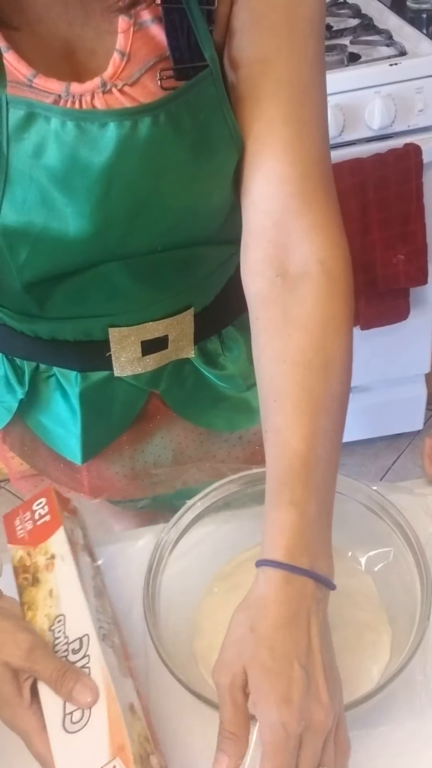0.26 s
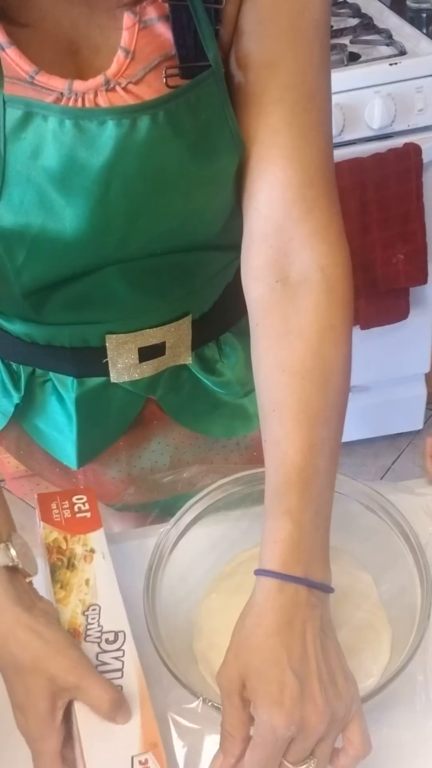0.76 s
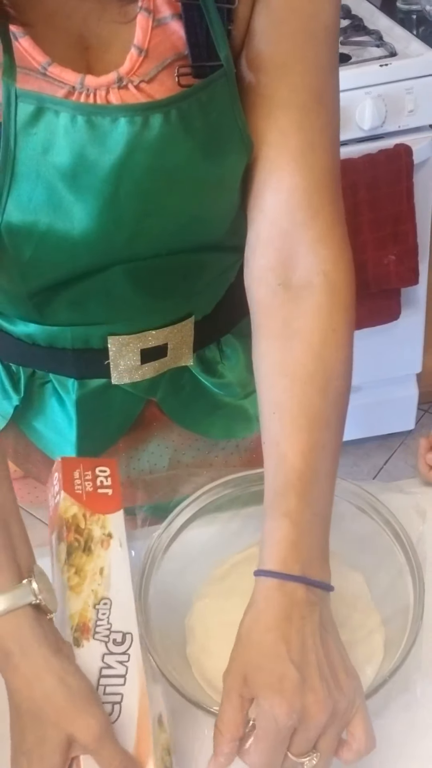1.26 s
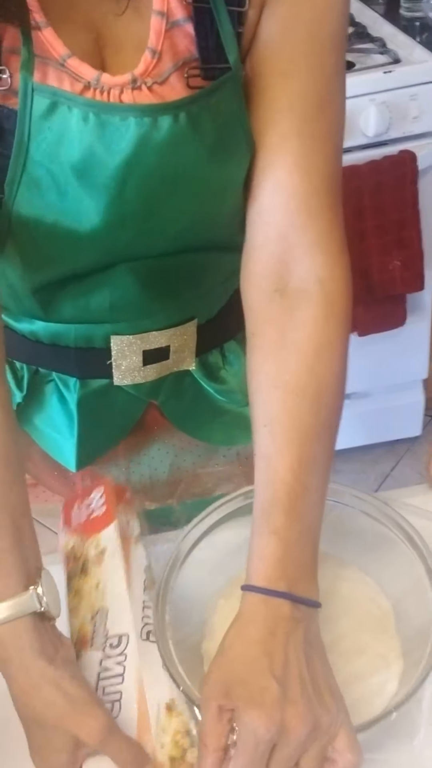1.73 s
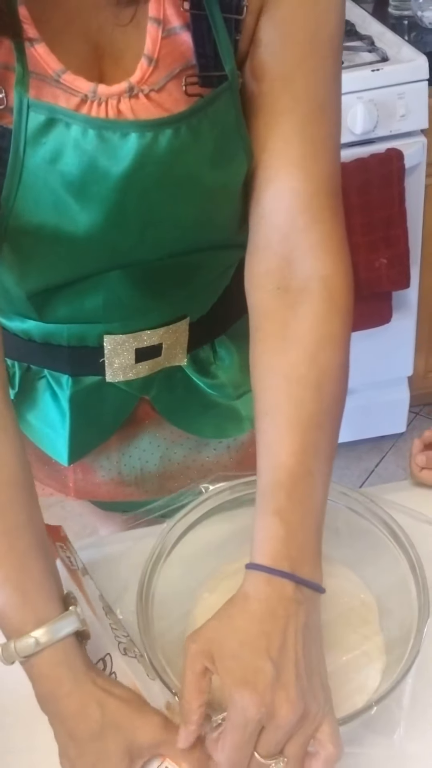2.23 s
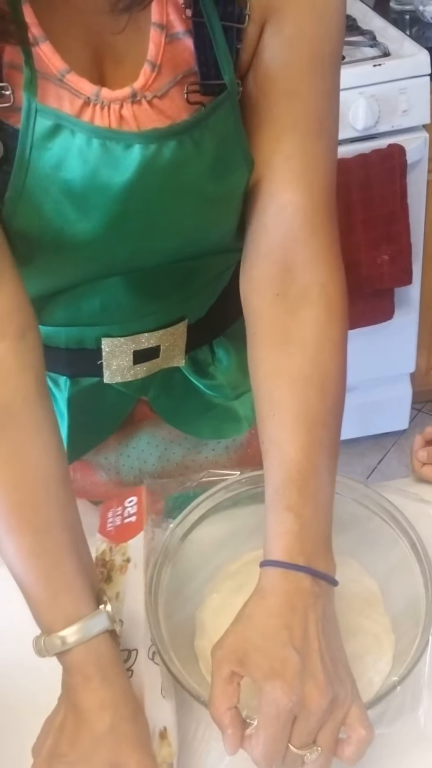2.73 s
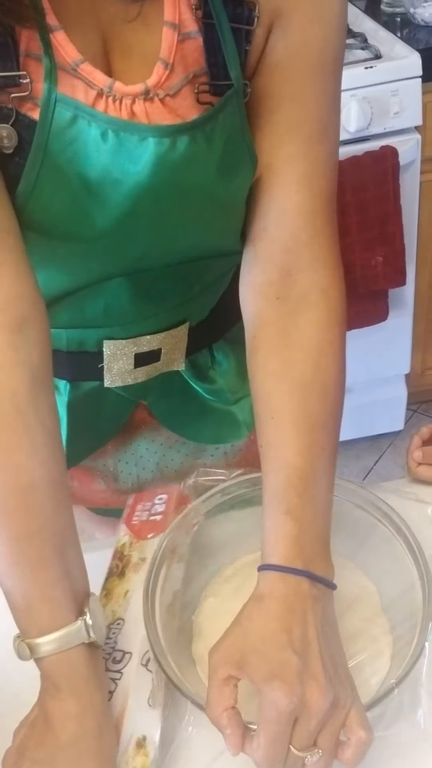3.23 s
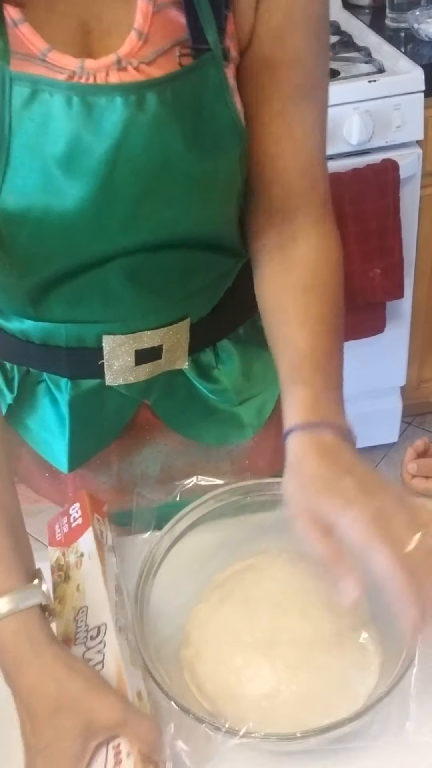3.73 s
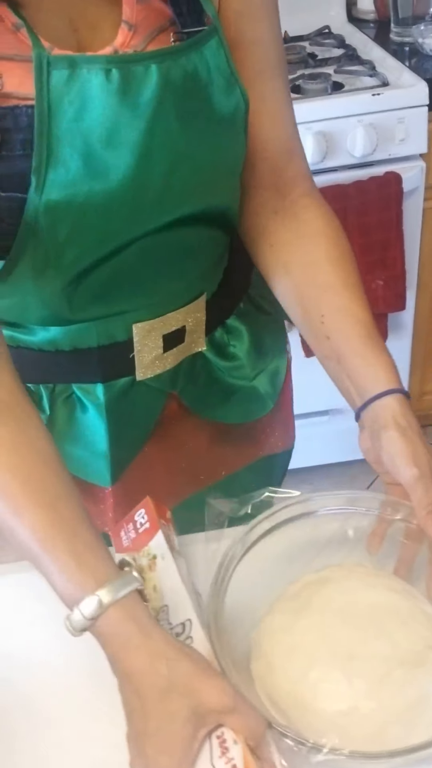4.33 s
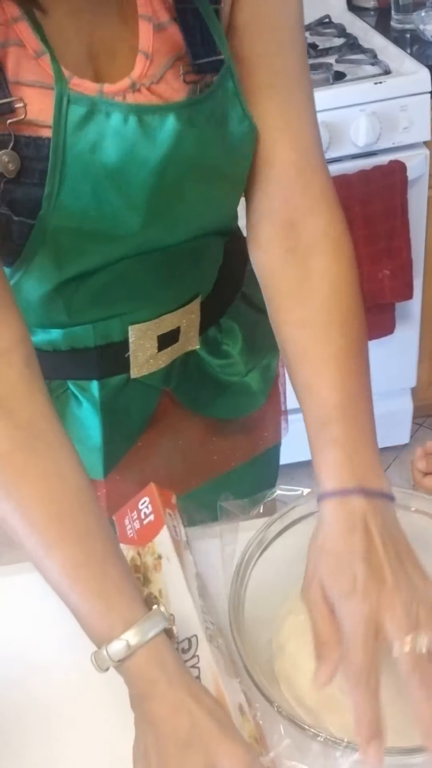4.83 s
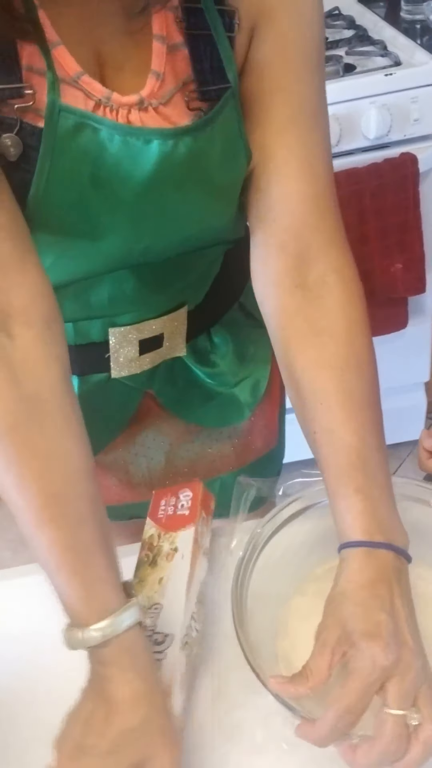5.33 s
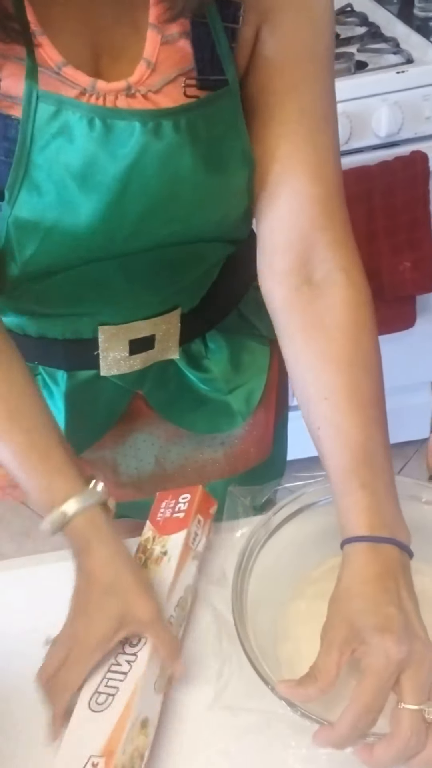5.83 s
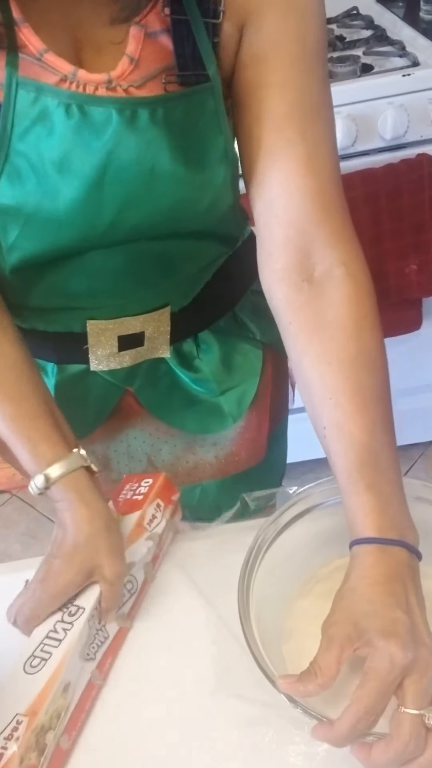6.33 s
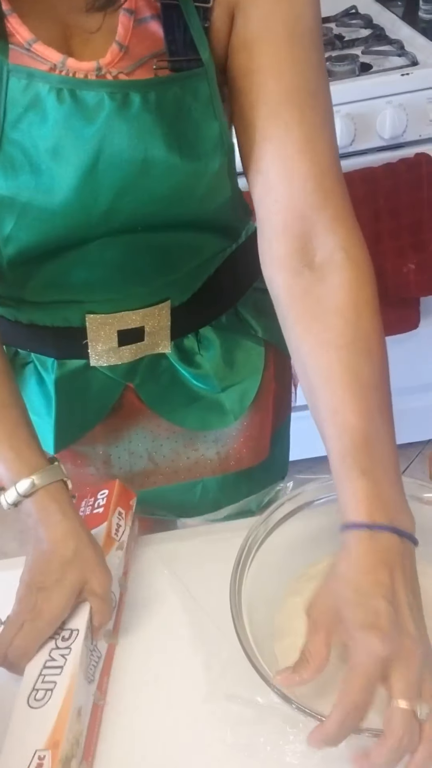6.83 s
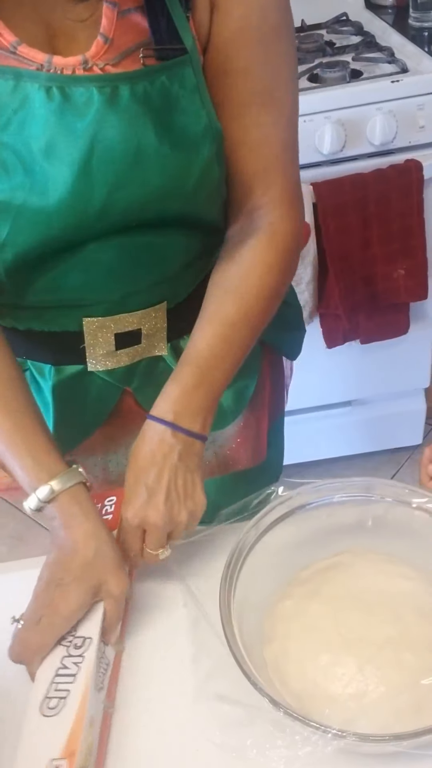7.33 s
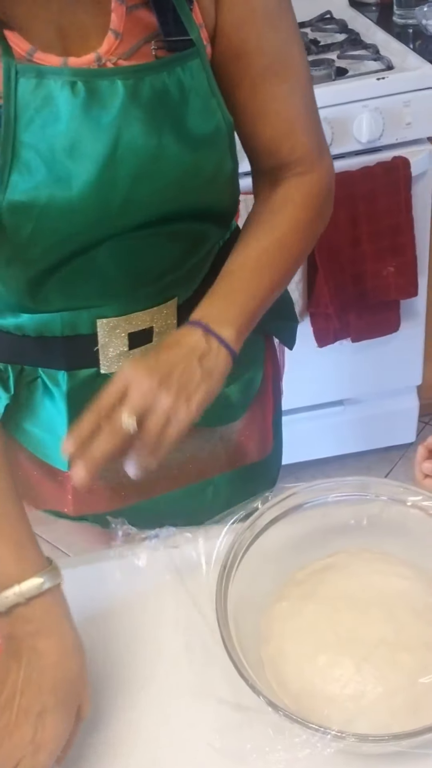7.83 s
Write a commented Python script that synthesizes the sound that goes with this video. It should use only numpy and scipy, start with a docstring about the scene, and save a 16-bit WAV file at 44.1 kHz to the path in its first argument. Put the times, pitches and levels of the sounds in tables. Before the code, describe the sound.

Close up in a small hard kitchen, plastic film rustles softly, then crackles and snaps harder as it is pulled from a cardboard carton. A dull knock lands, the carton scrapes, a glass bowl clinks sharply past the middle, and the film rips briefly. A strong counter thump follows, then quieter rubbing and a few light knocks. A phone hears it in stereo with short room echo.

```python
"""A kitchen counter in a small, hard room: cling film is drawn from its carton, stretched over a glass bowl
and torn off. Film crackles and snaps arise from random slips and filtered noise bursts; knocks of carton,
roll and settling bowl, counter booms and one clink of the bowl are sums of decaying modes, some with noise.
Scraping and sliding are filtered friction noise. A phone with two ports hears it close by, with the room's
echo and a faint steady noise."""
import sys
import numpy as np
from scipy import signal
from scipy.fft import rfft, irfft
from scipy.io import wavfile

SR = 44100
rng = np.random.default_rng(int(sys.argv[2]) if len(sys.argv) > 2 else 0)


def pcm_store(signal):
    """Save signal as 16-bit PCM."""
    levels = np.round(np.clip(np.atleast_2d(signal), -1, 1) * 32767)
    wavfile.write(sys.argv[1], SR, levels.astype(np.int16).T)


N = 355446
TIME = np.arange(N) / SR  # s

# pulls that draw and wrinkle the film: start_s, length_s, relative_level_db
FILM_PULLS = [(0.03, 0.13, -56.5), (0.34, 0.35, -58), (0.66, 0.26, -54.5), (0.88, 0.34, -54),
              (1.15, 0.15, -46.5), (1.43, 0.13, -43), (1.69, 0.28, -47.5), (2.09, 0.27, -54),
              (2.29, 0.2, -48.5), (2.43, 0.1, -44.5), (2.7, 0.084, -52.5), (2.91, 0.11, -48),
              (3.2, 0.3, -50), (3.41, 0.14, -48.5), (3.72, 0.38, -54.5), (4.5, 0.51, -54),
              (5.05, 0.15, -47), (5.45, 0.22, -51.5), (6.07, 0.12, -59), (6.41, 0.26, -65),
              (6.87, 0.035, -62), (7.14, 0.078, -60), (7.39, 0.14, -59), (7.55, 0.09, -53),
              (7.8, 0.12, -57.5)]
# single creases that snap through, loud and small: start_s, relative_peak_db, papery_body_re_snap_db
CREASE_SNAPS = [(0.7051, -28.5, -6.5), (0.7309, -28, -13), (1.1192, -36.5, -9), (1.2292, -29.5, -8),
                (1.2864, -26.5, -10), (1.4327, -21, -9.5), (1.456, -12.5, -12), (1.485, -18, -7),
                (1.5654, -22.5, -12.5), (1.8535, -28, 12), (1.866, -16.5, -13), (2.0201, -28.5, -12),
                (2.1243, -31, 0), (2.3161, -26.5, -7), (2.3802, -27, -7.5), (2.4766, -17, -33),
                (2.52, -28, -15), (2.539, -18, -15.5), (2.576, -31, -4), (2.7318, -32.5, -8.5),
                (2.7645, -26.5, -20), (2.8034, -27, -19), (2.8504, -32.5, -25), (2.9292, -18, -28),
                (2.951, -23.5, -14.5), (2.997, -21.5, -14), (3.148, -28.5, -27), (3.169, -29.5, -10),
                (3.7358, -24.5, -30), (3.7427, -25.5, -11), (4.9122, -31.5, -30), (5.1178, -29.5, -10),
                (5.294, -22.5, -16.5), (5.3006, -21, -8.5), (5.3464, -19.5, -12.5), (5.366, -8, -11),
                (5.3951, -8.5, -6.5), (5.4675, -26, 2.5), (5.517, -32, -2), (5.7426, -40, 13.5),
                (5.7573, -29.5, 14), (6.119, -30.5, 2.5), (6.4205, -32, -9.5), (6.558, -31.5, -11),
                (6.661, -21.5, -12), (6.6709, -28.5, -4.5), (6.7346, -33, -8), (7.5499, -21, -1)]
# knocks of the carton and its roll, and one dull blow as the bowl settles:
# start_s, relative_peak_db, hardness_tilt_db_per_octave
KNOCK_EVENTS = [(0.172, -31.5, 3), (0.343, -31, -2.5), (0.385, -33, 6), (0.551, -30.5, -15.5),
                (1.044, -31, -7), (1.3, -30.5, -4), (1.727, -27, -4), (1.827, -20.5, 25),
                (1.852, -8.5, -8.5), (2.126, -25, -12), (2.317, -30, -4), (2.475, -29, 1), (3.7359, -23, 1),
                (3.9, -22.5, 3.5), (3.921, -26, 7), (4.44, -21, -5), (4.66, -26.5, -9.5),
                (4.912, -31.5, -8), (5.396, -12, 7), (5.4675, -19, -4.5), (5.757, -27, -2),
                (5.81, -26.5, 2), (6.19, -19.5, -7), (7.553, -21.5, -5), (7.857, -27, -36),
                (7.956, -21.5, -30.5)]
# blows that reach the counter top: start_s, dry_peak_db, contact_time_ms
COUNTER_BLOWS = [(0.173, -39.5, 0.75), (0.347, -34.5, 1.3), (0.422, -35, 1.3), (0.555, -34, 1.2),
                 (1.853, -18, 0.57), (1.872, -12.5, 0.4), (2.081, -23, 0.66), (3.001, -19, 4.9),
                 (3.31, -31.5, 1.7), (4.39, -21, 3), (4.66, -29, 0.74), (5.393, -18.5, 0.65),
                 (5.468, -14.5, 2.7), (5.758, 0, 1.8), (6.241, -15.5, 6), (7.153, -36, 4.7),
                 (7.411, -25.5, 4.9), (7.548, -24.5, 4.2), (7.955, -13.5, 1.8)]
# strikes on the glass bowl: start_s, dry_peak_db
BOWL_STRIKES = [(4.3858, -4.5)]
# shoves of carton and bowl: start_s, length_s, relative_rub_level_db, relative_rumble_level_db
COUNTER_SHOVES = [(0, 0.11, -52.5, -53), (0.343, 0.11, -55, -74), (0.53, 0.32, -58.5, -63),
                  (1.015, 0.2, -54.5, -60.5), (1.18, 0.54, -48.5, -52.5), (1.53, 0.48, -47, -41.5),
                  (2.008, 0.26, -57, -42), (2.24, 0.33, -53.5, -52), (2.704, 0.087, -58.5, -50),
                  (2.917, 0.28, -56.5, -48.5), (3.307, 0.19, -47.5, -45), (3.733, 0.095, -52, -46.5),
                  (3.893, 0.083, -48.5, -36.5), (4.092, 0.3, -49, -34.5), (4.623, 0.14, -56, -49),
                  (4.88, 0.4, -51, -50), (5.42, 0.48, -50, -37), (5.986, 0.24, -48, -34),
                  (6.36, 0.37, -74, -48.5), (6.874, 0.026, -61.5, -51), (7.136, 0.43, -60.5, -47.5),
                  (7.368, 0.24, -55.5, -43.5), (7.517, 0.36, -51, -43.5), (7.73, 0.24, -52, -44)]
# smooth slides of bowl, carton and hand: start_s, length_s, hiss_centre_hz, relative_level_db
SMOOTH_SLIDES = [(4.01, 0.48, 2730, -48.5), (4.868, 0.18, 1070, -52), (5.026, 0.26, 770, -48),
                 (5.953, 0.42, 2650, -55), (6.867, 0.13, 2970, -62.5), (7.699, 0.088, 3820, -47)]

# modes of the counter top: nominal_frequency_hz, relative_level_db, t60_s
COUNTER_MODES = [(54.7,-20,0.46), (89.5,-24.5,0.17), (114.3,-16,0.5), (144,0,0.17), (194.8,0.5,0.076),
                 (236,-2.5,0.049), (289,-10,0.26), (327.6,-18,0.15), (420,-4,0.081)]
# modes of the hollow carton: nominal_frequency_hz, relative_level_db, t60_s
CARTON_MODES = [(335.3, -7, 0.11), (650, -21.5, 0.12), (778, 7, 0.03), (800, -7, 0.06), (1010, -42, 0.0203),
                (1170, 1, 0.04), (1395, -4.5, 0.021), (1610, -4, 0.015), (1950, -25.5, .03),
                (2550, 3.5, 0.0099), (3080, -31.5, 0.0097)]
# modes of the glass bowl: frequency_hz, relative_level_db, t60_s
BOWL_MODES = [(581,-2,.21), (775,-20,.2), (947,-15,.12), (1287,-21,.2), (1660,0,.04), (1793,0,.11),
              (1940,1,.05), (2045,-7,.12), (2164,-7,.34), (2273,1,.38), (2310,-4,.2), (2369,-1,.3),
              (2473,-5,.2), (2702,-14,.2), (3020,-13,.36), (3521,-12,.18), (3700,-4,.08), (3876,-4,.14),
              (4090,-10,.2), (5028,-7,.21), (5130,-20,.42), (7197,-20,.2), (7585,-22,.22), (8753,-30,.25),
              (10770,-14,.1), (10900,-14,.08), (13310,-25,.14)]

# spectrum of crackling film: frequency_hz, relative_level_db
FILM_SPECTRUM = [(400, 9), (900, -23), (2000, 4), (3500, 3), (5500, 2), (7000, 3.5), (8500, -1.5),
                 (11000, 3.5), (13500, 4.5), (16000, 3.5)]
# spectrum of a snapping crease: frequency_hz, relative_level_db
SNAP_SPECTRUM = [(800, -8.5), (2000, 6), (3500, 4), (6000, 9.5), (8500, 4), (11000, 9.5), (13500, 7.5),
                 (16000, 5.5)]
# spectrum of papery, hollow noise: frequency_hz, relative_level_db
PAPER_SPECTRUM = [(150, -39.5), (400, -4.5), (800, 3.5), (1300, -1.5), (2000, -4), (3200, -11.5),
                  (6000, -18.5), (16000, -24)]
# spectrum of the crack as glass is tapped: frequency_hz, relative_level_db
GLASS_SPECTRUM = [(200, -18), (600, -1), (1200, -4), (2000, 0), (3900, -8), (4600, -20), (7200, -16),
                  (10000, -22), (14000, -24), (16000, -36)]
# spectrum of the counter's rumble: frequency_hz, relative_level_db
RUMBLE_SPECTRUM = [(25, -71), (52, 0), (68, -29), (95, 4), (118, -5), (145, 6), (175, -2), (230, -5.5),
                   (300, -10.5), (420, -13.5), (700, -31), (2000, -54)]
# spectrum of the steady kitchen noise: frequency_hz, relative_level_db
KITCHEN_SPECTRUM = [(25, -49.5), (55, 3.5), (145, -16), (300, -7), (560, -17.5), (1000, -9), (2000, -17),
                    (5000, -25), (16000, -27)]
# decay of the room by band: band_centre_hz, t60_s, relative_echo_level_db
ROOM_BANDS = [(120, 0.6, -14), (300, 0.34, -5), (750, 0.48, -2), (2000, 0.42, -5), (4900, 0.42, -5.5),
              (12900, 0.27, -11)]

# every move of a hand swells, holds while it tires a little, and dies away
PULL_ATTACK_S, PULL_SAG_DB_PER_S, PULL_RELEASE_T60_S = 0.025, 6, 0.92
SHOVE_ATTACK_S, SHOVE_SAG_DB_PER_S, SHOVE_RELEASE_T60_S = 0.035, 2.5, 0.76
# the rip catches at once and slackens as less film is left to hold; its level is relative
TEAR_START_S, TEAR_LENGTH_S, TEAR_DB = 5.364, 0.12, -29
TEAR_ATTACK_S, TEAR_SAG_DB_PER_S, TEAR_RELEASE_T60_S = 0.02, 37.5, 0.13
PORT_LAG_MS, TOP_HZ = 0.19, 15900
KITCHEN_DB = -61  # gain applied to the coloured noise


def crackle():
    """Stick-slip emission: film peels from the roll and wrinkles in a fine fizz with coarser ticks."""
    fizz = bursts(rate=1800, spread_db=3, t60=0.005)
    ticks = bursts(rate=170, spread_db=4.5, t60=0.006)
    pull = moves(FILM_PULLS, PULL_ATTACK_S, PULL_SAG_DB_PER_S, PULL_RELEASE_T60_S)
    film = colour(fizz + ticks, FILM_SPECTRUM)
    return undb(-2.0) * ports(film, lag_ms=0.12, width=1.0) * pull


def snaps(rise_s=0.001345, flutter_t60=0.18, flutter_db=-19):
    """Buckling instability: a crease gives way in a millisecond or two, then the slack sheet flutters."""
    out = np.zeros((2, N))
    t = np.arange(SR // 8) / SR
    rise = np.minimum(t / rise_s, 1) ** 2
    after = np.maximum(t - rise_s, 0)
    tick = fade(after, 0.008)
    flutter = undb(flutter_db) * fade(after, flutter_t60)
    hollow = fade(after, 0.045)
    for start_s, level_db, body_db in CREASE_SNAPS:
        snap_noise = rng.standard_normal((2, len(t)))
        body_noise = rng.standard_normal((2, len(t)))
        snap = colour(snap_noise * rise * (tick + flutter), SNAP_SPECTRUM)
        body = colour(body_noise * rise * hollow, PAPER_SPECTRUM)
        lag_ms = PORT_LAG_MS * rng.uniform(0.38, 1.4)  # creases lie all over the sheet
        snap = peak(ports(snap, lag_ms, width=0.27), level_db)
        body = peak(ports(body, lag_ms), level_db + body_db)
        add(out, start_s, undb(1) * (snap + body))
    return out


def tear():
    """Progressive fracture: the taut film gives way tooth by tooth and shakes the carton."""
    teeth = bursts(rate=800, spread_db=3.7, t60=0.004)
    rip = stroke(TEAR_START_S, TEAR_LENGTH_S, TEAR_ATTACK_S, TEAR_SAG_DB_PER_S, TEAR_RELEASE_T60_S)
    film = undb(-5.5) * colour(teeth, FILM_SPECTRUM)
    carton = undb(-1.5) * colour(teeth, PAPER_SPECTRUM)
    return ports(film + carton, width=0.99) * undb(TEAR_DB) * rip


def knocks(rise_s=0.0013):
    """Modal response: hollow carton modes and a papery rattle, also used for the bowl's settling blow."""
    out = np.zeros((2, N))
    t = np.arange(SR // 5) / SR
    for start_s, level_db, tilt_db in KNOCK_EVENTS:
        tone = unit(ring(CARTON_MODES, t, tilt_db, scatter_db=6.0, detune=0.069))
        noise = rng.standard_normal((2, len(t))) * fade(t, 0.13)
        rattle = unit(colour(noise, PAPER_SPECTRUM))
        knock = (undb(-8) * rattle + common(tone)) * np.minimum(t / rise_s, 1)
        add(out, start_s, peak(ports(knock), level_db - 1))
    return out


def thumps(build_s=0.0028):
    """Impulse and contact time: a blow pushes the counter top, and a longer push gives a duller boom."""
    out = np.zeros((2, N))
    t = np.arange(int(SR * 0.7)) / SR
    for start_s, level_db, contact_ms in COUNTER_BLOWS:
        push = signal.windows.hann(int(contact_ms * SR / 1000))
        panel = ring(COUNTER_MODES, t, scatter_db=4.0, detune=0.0039)
        panel = panel * np.minimum(t / build_s, 1)  # the bending wave needs time to spread
        boom = radiate(signal.fftconvolve(panel, push)[:len(t)])
        add(out, start_s, peak(ports(common(boom)), level_db))
    return out


def clinks():
    """Modal response of glass: a hard tap gives a crack and closely spaced ringing modes."""
    out = np.zeros((2, N))
    t = np.arange(int(SR * 0.7)) / SR
    for start_s, level_db in BOWL_STRIKES:
        glass = ring(BOWL_MODES, t)
        noise = rng.standard_normal((2, len(t))) * fade(t, 0.035)
        crack = undb(7) * colour(noise, GLASS_SPECTRUM)
        clink = ports(crack + common(glass), lag_ms=0.07, width=0.4)
        add(out, start_s, peak(clink, level_db))
    return out


def scraping():
    """Stick-slip friction: what is shoved catches and slips while the counter top rumbles under it."""
    start_s, length_s, rub_db, rumble_db = np.transpose(COUNTER_SHOVES)
    hand = SHOVE_ATTACK_S, SHOVE_SAG_DB_PER_S, SHOVE_RELEASE_T60_S
    rub = moves(zip(start_s, length_s, rub_db), *hand)
    drag = moves(zip(start_s, length_s, rumble_db), *hand)
    carton = colour(bursts(rate=270, spread_db=5.0, t60=0.1), PAPER_SPECTRUM)
    counter = colour(bursts(rate=160, spread_db=-0.5, t60=0.021), RUMBLE_SPECTRUM)
    return ports(carton * rub * undb(0.5) + counter * drag * undb(2.5))


def slides():
    """Sliding friction of smooth surfaces: a narrow hiss swells and dies."""
    out = np.zeros((2, N))
    slips = bursts(rate=1200, spread_db=1.5, t60=0.0016)
    for start_s, length_s, hz, level_db in SMOOTH_SLIDES:
        span = slips[:, int(start_s * SR):int((start_s + length_s) * SR)]
        band = [(hz / 4, -28), (hz / 1.3, -8), (hz, 0), (hz * 1.3, -6), (hz * 4, -24)]
        hiss = ports(colour(span, band))
        add(out, start_s, hiss * np.hanning(span.shape[1]) * undb(level_db))
    return out


def room(dry, first_s=0.0022, build_s=0.0058):
    """Reverberation: hard walls answer within milliseconds, as noise with its own decay in each band."""
    t = np.arange(int(SR * 0.6)) / SR
    hz, t60, level_db = np.transpose(ROOM_BANDS)
    noise = rfft(ports(rng.standard_normal((2, len(t))), lag_ms=0, apart_hz=663, width=0.87))
    log_hz = np.log(np.fft.rfftfreq(len(t), 1 / SR) + 1)
    onset = np.clip((t - first_s) / build_s, 0, 1)
    response = 0
    for band, seconds, echo_db in zip(np.eye(len(hz)), t60, level_db):
        shape = fade(t, seconds) * onset
        weight = np.interp(log_hz, np.log(hz), band)  # neighbouring bands cross-fade
        part = irfft(noise * weight, len(t))
        response = response + part * shape * undb(echo_db) / np.sqrt(2 * np.sum(shape ** 2))
    return signal.fftconvolve(dry, response, axes=1)[:, :N]


def kitchen():
    """Stationary coloured noise: the faint steady background of the kitchen."""
    noise = colour(rng.standard_normal((2, N)), KITCHEN_SPECTRUM)
    return ports(noise, lag_ms=0, width=1.0) * undb(KITCHEN_DB)


def stroke(start_s, length_s, attack_s, sag_db_per_s, release_t60):
    """Envelope of one move of the hand: it swells, sags steadily in decibels and dies away."""
    t = np.maximum(TIME - start_s, 0)
    swell = np.minimum(t / attack_s, 1)
    release = fade(np.maximum(t - length_s, 0), release_t60)
    return swell * undb(-sag_db_per_s * t) * release


def moves(rows, attack_s, sag_db_per_s, release_t60):
    """Envelope of successive moves: where they overlap the stronger one leads."""
    gains = [undb(level_db) * stroke(start_s, length_s, attack_s, sag_db_per_s, release_t60)
             for start_s, length_s, level_db in rows]
    return np.max(gains, axis=0)


def grains(rate, spread_db):
    """Poisson-like slips: rate per second, decibel levels from a capped exponential draw; rms 1."""
    size = undb(spread_db * np.minimum(rng.exponential(size=N), 4.5))
    return unit((rng.random(N) < rate / SR) * size)


def bursts(rate, spread_db, t60):
    """Energy decay after excitation: each slip sets off a decaying burst of noise."""
    energy = grains(rate, spread_db) ** 2 + 1e-12
    power = signal.lfilter([1], [1, -fade(2 / SR, t60)], energy)
    return unit(np.sqrt(power)) * rng.standard_normal((2, N))


def ring(modes, t, tilt_db=0, scatter_db=0, detune=0):
    """Modal superposition: level scatter and detuning stand for where an object is struck and held."""
    hz, level_db, t60 = np.transpose(modes)[:, :, None]
    level_chance, pitch_chance = rng.standard_normal((2, len(modes), 1))
    gain = undb(level_db + tilt_db * np.log2(hz / hz[0]) + scatter_db * level_chance)
    pitch_hz = hz * (1 + detune * pitch_chance)
    return (gain * np.sin(2 * np.pi * pitch_hz * t) * fade(t, t60)).sum(axis=0)


def radiate(x, corner_hz=85):
    """Radiation efficiency: a panel sends out little of its slowest motion."""
    return signal.sosfilt(signal.butter(2, corner_hz, "high", fs=SR, output="sos"), x)


def colour(x, points, size=4096):
    """Minimum-phase filtering: impose a spectrum causally, with unit power gain."""
    hz, level_db = np.transpose(points)
    log_hz = np.log(np.fft.rfftfreq(size, 1 / SR) + 1)
    gain = unit(undb(np.interp(log_hz, np.log(hz), level_db)))
    cepstrum = irfft(np.log(gain))
    cepstrum[1:size // 2] *= 2  # fold onto positive times
    cepstrum[size // 2 + 1:] = 0
    response = irfft(np.exp(rfft(cepstrum)))[None, :size // 2]
    return signal.fftconvolve(x, response, axes=1)[:, :x.shape[1]]


def common(x):
    """In-phase excitation: a common signal with no differing part."""
    return np.array([x, 0 * x])


def ports(x, lag_ms=PORT_LAG_MS, apart_hz=1800, width=0.95):
    """Spatial coherence: common and differing signals, alike in the bass; the left port may lag."""
    treble = signal.butter(1, apart_hz, "high", fs=SR, output="sos")
    side = width * signal.sosfilt(treble, x[1])
    lag = int(lag_ms * SR / 1000)
    left = np.pad(x[0] + side, (lag, 0))[:len(side)]
    return np.array([left, x[0] - side])


def fade(t, t60):
    """Exponential decay: a fall of 60 dB in t60 seconds."""
    return np.exp(-np.log(1000) * t / t60)


def undb(db):
    """Logarithmic level: decibels to amplitude gain."""
    return 10 ** (np.asarray(db) / 20)


def unit(x):
    """Root-mean-square normalisation: scale to rms 1."""
    return x / np.sqrt(np.mean(x ** 2))


def peak(x, db):
    """Peak normalisation: the mean of the two channels peaks at db."""
    return x * undb(db) / np.abs(x.mean(axis=0)).max()


def add(out, start_s, x):
    """Linear superposition: mix a sound in at start_s."""
    start = max(int(start_s * SR), 0)
    out[:, start:start + x.shape[1]] += x[:, :N - start]


def scene():
    """Superposition of all the handling, its echo and the kitchen's steady noise."""
    dry = crackle() + snaps() + tear() + knocks() + thumps() + clinks() + scraping() + slides()
    return dry + room(dry) + kitchen()


def record(dry):
    """Saturation and band limiting: the phone clips at full scale and cuts the top."""
    low_pass = signal.ellip(10, 0.2, 70, TOP_HZ, fs=SR, output="sos")
    return signal.sosfilt(low_pass, np.clip(dry, -1, 1))


dry = scene()
out = record(dry)
pcm_store(out)
```